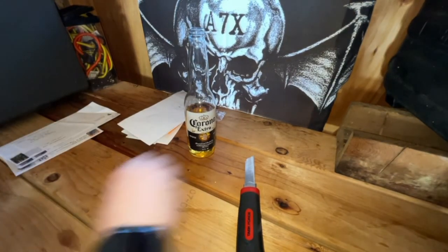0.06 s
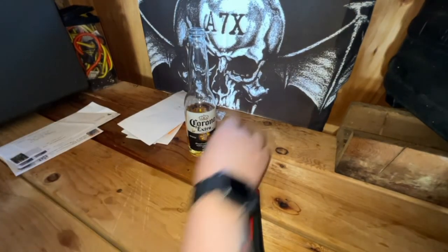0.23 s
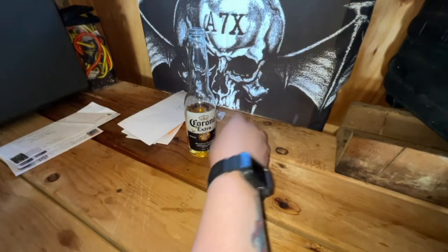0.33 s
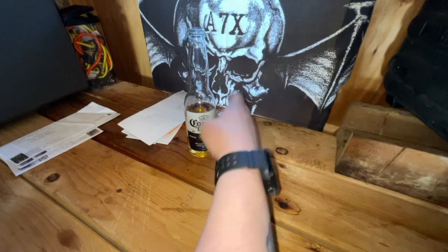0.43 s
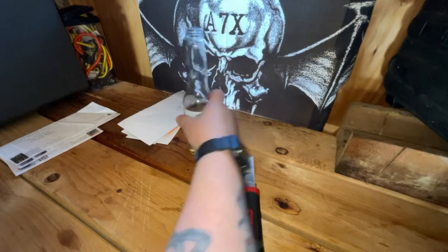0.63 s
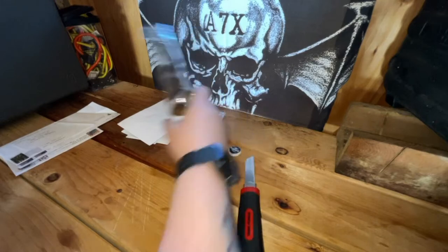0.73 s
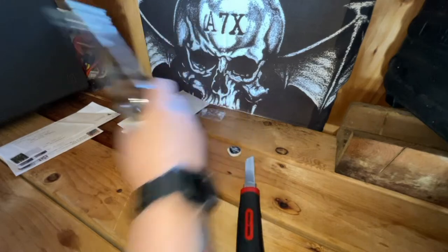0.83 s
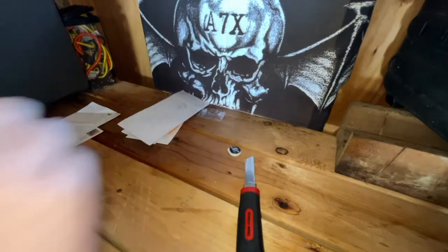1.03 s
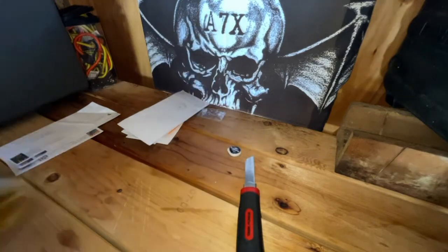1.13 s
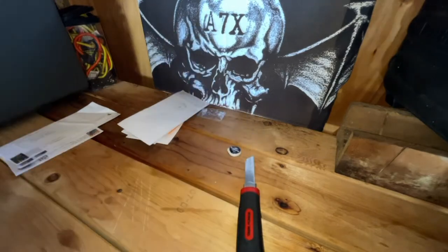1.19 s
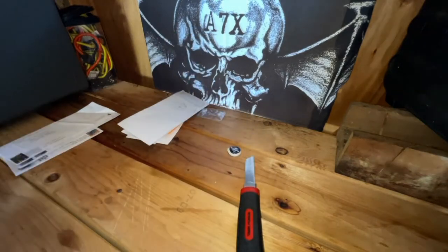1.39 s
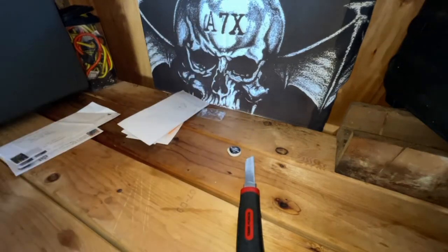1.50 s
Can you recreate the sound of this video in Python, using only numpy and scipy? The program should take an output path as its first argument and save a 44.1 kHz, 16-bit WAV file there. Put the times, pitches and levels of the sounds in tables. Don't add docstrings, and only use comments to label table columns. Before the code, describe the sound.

A hard, bright glass clink with quick bounces, lighter taps and a short woody scrape indoors

```python
import sys
import numpy as np
from scipy import signal
from scipy.fft import rfft, irfft
from scipy.io import wavfile
from scipy.ndimage import uniform_filter1d

SR = 44100
rng = np.random.default_rng(int(sys.argv[2]) if len(sys.argv) > 2 else 0)


def transcribe(u):
    v = np.clip(np.atleast_2d(u).T, -1, 1)
    q = np.round(v * 32767).astype(np.int16)
    wavfile.write(sys.argv[1], SR, q)


def linear_from_db(decibels):
    return 10 ** (np.asarray(decibels, float) / 20)


N = 68355
RISE_S = 0.0005
UPPER_SWELL_S = 0.001
GRIP_S = 0.49


def evened(x):
    return x / np.sqrt(np.mean(x ** 2) + 1e-20)


def read(points, hz):
    f, value = np.transpose(points)
    return np.interp(np.log(hz + 1), np.log(f + 1), value)


def add(mix, s, sound):
    part = mix[round(s * SR):][:len(sound)]
    part += sound[:len(part)]


def shaped(x, points, tilt_db=0):
    hz = np.fft.rfftfreq(x.shape[-1], 1 / SR)
    gain_db = read(points, hz) + tilt_db * np.log2(hz / 2000 + 0.29)
    return irfft(rfft(x) * linear_from_db(gain_db), x.shape[-1])


def ring(modes, scatter_db, pitch=1, rise_s=RISE_S):
    t = np.arange(SR // 3) / SR
    out = np.zeros(len(t))
    for (hz, db, t60), scatter in zip(modes, scatter_db):
        out += linear_from_db(db + scatter - 60 * t / t60) * np.sin(2 * np.pi * hz * pitch * t)
    return (1 - np.exp(-t / rise_s)) ** 2 * out


def strokes(start, end, bend):
    t = np.arange(N) / SR
    return np.sin(np.pi * np.clip((t - start) / (end - start), 0, 1) ** bend)


def wavering(hz, width):
    f = np.fft.rfftfreq(N, 1 / SR)
    return evened(irfft(rfft(rng.standard_normal(N)) / (1 + (2 * (f - hz) / width) ** 4), N))


def tone(curve, turns):
    t = np.arange(N) / SR
    s, hz, db = np.transpose(curve)
    cycles = turns + np.cumsum(np.interp(t, s, hz)) / SR
    return np.sqrt(2) * linear_from_db(np.interp(t, s, db)) * np.sin(2 * np.pi * cycles)


# pitch in Hz, level in dB.
AIR_SPECTRUM = [(76, -17), (130, -5), (198, -5), (348, -7.5), (461, -11), (893, -13), (1660, -13.5),
                (6390, -41.5), (15800, -46)]


def air():
    frames, hz = N // 256 + 5, np.fft.rfftfreq(1024, 1 / SR)
    a, b, patches = rng.standard_normal((frames, 513, 3)).T
    swell = evened(uniform_filter1d(patches[0], 30))
    patches = evened(uniform_filter1d(uniform_filter1d(patches, 12, 0), 12, 1))
    level_db = read(AIR_SPECTRUM, hz)[:, None] + 1.4 * patches + 0.13 * swell
    z = (a + 1j * b) * linear_from_db(level_db) * (hz > 60)[:, None]
    return linear_from_db(-50.5) * evened(signal.istft(z, nperseg=1024, noverlap=768)[1][:N])


# time in seconds, pitch in Hz, level in dB.
MAIN_HUM = [(0.0, 59.5, -39), (0.03, 56.94, -31.5), (0.172, 56.06, -35), (0.272, 55.4, -40.5),
            (0.518, 55.06, -38.5), (0.544, 55.93, -43), (0.604, 55.74, -35.5), (0.65, 55.32, -40),
            (0.694, 55.9, -32.5), (0.738, 55.1, -44), (0.768, 54.44, -39), (0.88, 52.86, -47),
            (1.078, 53.8, -36.5), (1.1, 53.2, -42), (1.23, 53.2, -37), (1.32, 50.7, -47.5),
            (1.342, 49.97, -40), (1.55, 49.56, -42)]
# time in seconds, pitch in Hz, level in dB.
SECOND_TONE = [(0, 67.8, -85), (.45, 66.57, -59.5), (.6, 66.6, -50.5), (1.0, 67.43, -50.5),
               (1.25, 65.15, -52.5), (1.55, 66.5, -49)]
# pitch in Hz, level in dB.
FUZZY_TONES = [(111.4, -54), (43, -53.5), (161.6, -67)]


def hum():
    out = tone(MAIN_HUM, 0) + tone(SECOND_TONE, 0.3)
    for hz, db in FUZZY_TONES:
        out += linear_from_db(db) * wavering(hz, 11)
    rumble = wavering(60, 50)
    return out + linear_from_db(-46) * rumble


# pitch in Hz, time to fade by 60 dB in seconds.
ROOM_FADE = [(300, 0.22), (1500, .22), (3500, 0.18), (5100, 0.15), (9000, .14), (15000, 0.055)]


def room(x):
    taps = np.zeros(SR // 2)
    at = np.arange(120, len(taps) - 20, 20)
    taps[at + rng.integers(0, 20, len(at))] = rng.choice([-1., 1.], len(at))
    hz, t, z = signal.stft(taps, SR, nperseg=256)
    fade = linear_from_db(-60 * t / read(ROOM_FADE, hz)[:, None])
    tail = signal.istft(z * fade, SR, nperseg=256)[1]
    return signal.fftconvolve(x, tail / np.linalg.norm(tail))[:N]


# start in seconds, end in seconds, level in dB.
FIZZ_STROKES = [
    (0.246, .32, -58),
    (0.397, .43, -59),
    (.452, 0.513, -67),
    (0.487, .545, -64),
    (.69, 0.7, -68),
]
# pitch in Hz, level in dB.
FIZZ_SPECTRUM = [(12900, -40), (13400, -3), (13900, -12), (14800, 0), (15300, -5), (15800, -25)]


def fizz(grit):
    patch = round(0.006 * SR)
    patches = evened(uniform_filter1d(uniform_filter1d(grit, patch), patch))
    hiss = evened(shaped(grit, FIZZ_SPECTRUM) * linear_from_db(3 * patches))
    out = np.zeros(N)
    for start, end, db in FIZZ_STROKES:
        out += linear_from_db(db) * strokes(start, end, 0.59) * hiss
    return out


# start in seconds, end in seconds, grit level in dB,
# level in dB of the glass rings it sets singing, tilt in dB per octave (higher is brighter).
RUBS = [
    (.378, 0.48, -47, -85, -2.5),
    (-0.18, .24, -62, -90, 6),
    (.245, .34, -52, -90, 8),
    (.492, 0.5834, -44, -63, 0),
    (.378, .435, -62, -68, 4.5),
    (.455, 0.55, -64, -72, 10),
    (1.36, 1.55, -62.5, -95.5, -1.5),
]
# pitch in Hz, level in dB.
GRIT_SPECTRUM = [(250, -23), (700, -4.5), (2500, -1.5), (4600, -12.5), (5300, -13.5), (6000, -23.5),
                 (12000, -28), (15800, -33.5)]


def scraping(grit):
    high = UPPER_GLASS[1:]
    damped = [(hz, db, 0.12 * t60) for hz, db, t60 in high]
    sung = evened(signal.fftconvolve(grit, ring(damped, np.zeros(len(high))))[:N])
    out = np.zeros(N)
    for start, end, grit_db, sung_db, tilt_db in RUBS:
        hiss = evened(shaped(grit, GRIT_SPECTRUM, tilt_db))
        out += strokes(start, end, 0.5) * (linear_from_db(grit_db) * hiss + linear_from_db(sung_db) * sung)
    return out


# time in seconds, level in dB, pitch factor.
BASE_SLIPS = [
    (0.502, -38, 1.05),
    (0.5075, -34, 1.24),
    (0.5139, -27, 1.06),
    (0.5268, -31.5, 0.92),
    (0.537, -40, .85),
    (0.544, -34.5, 0.954),
    (.549, -38, .8),
]
# pitch in Hz, level in dB, time to fade by 60 dB in seconds.
BOARDS = [(177, -35, 0.076), (233, -2.5, 0.052), (304, 1, 0.044), (391, -7.5, 0.042), (546, -6, 0.036),
          (647, -15, 0.032)]


def slips():
    out = np.zeros(N)
    for s, db, pitch in BASE_SLIPS:
        scatter = 4 * rng.standard_normal(len(BOARDS))
        add(out, s, linear_from_db(db) * ring(BOARDS, scatter, pitch))
    return out


def drag():
    grit = (rng.random(N) < 11000 / SR) * rng.standard_normal(N)
    return slips() + scraping(grit) + fizz(grit)


# pitch in Hz, level in dB.
CRACK_SPECTRUM = [(100, -40.5), (300, -18.5), (1500, -12.5), (3500, -9.5), (5000, -9), (7240, -10.5),
                  (12000, -16.5), (15800, -33)]


def crack(db, noise, dull_db=0):
    t = np.arange(len(noise)) / SR
    tilt_db = dull_db - 6.5 * (-11.0 - db) / 20
    envelope = (1 - np.exp(-t / RISE_S)) * linear_from_db(db - 60 * t / 0.048)
    return envelope * evened(shaped(noise, CRACK_SPECTRUM, tilt_db))


# time in seconds, pitch in Hz, level in dB,
# time to fade by 60 dB in seconds.
LONE_RINGS = [(.3805, 6580, -39, .055), (.402, 6578, -53, .14), (.4935, 6592, -36, .04),
              (.494, 13370, -52, .07), (.511, 13370, -54, .1), (.544, 13380, -60, .09),
              (.462, 9400, -60, .05), (.494, 11880, -48, .03), (.4985, 9750, -50, .03),
              (.494, 2400, -42, .05), (.515, 7500, -52, .04), (.542, 11950, -52, .04),
              (.542, 10700, -54, .04), (.546, 7280, -55, .07), (.556, 12030, -55, .05),
              (.536, 15500, -58, .03), (.471, 7800, -60, .03), (.3805, 11860, -54, .03),
              (.381, 12850, -50, .06), (.392, 2280, -44, .05), (.58, 5080, -56, .06),
              (.381, 9380, -43, .07), (.409, 13385, -60, .1), (.402, 15000, -58, .04),
              (.416, 15050, -58, .04), (.381, 1380, -44, .07), (.258, 4602, -25, .12),
              (.29, 4612, -35, .12), (.335, 4590, -55, .2), (.245, 920, -27, .05), (.246, 450, -32, .06),
              (.38, 1650, -41, .05), (.669, 14800, -64, .04), (.697, 14900, -56, .01),
              (.697, 13700, -58, .01)]


def lone_rings():
    out = np.zeros(N)
    for s, hz, db, t60 in LONE_RINGS:
        add(out, s, ring([(hz, db, t60)], [0], 1, UPPER_SWELL_S))
    return out


# time in seconds, then levels in dB of the crack, the low ring,
# the second ring and the upper rings.
GLASS_TAPS = [
    (0.3794, -32.5, -32, -48, -64),
    (0.3908, -43, -50, -37.5, -68),
    (0.4933, -34.5, -38, -35.5, -50),
    (.512, -50, -38, -46, -61),
    (0.5420, -38.5, -28, -44.5, -50.5),
]
# pitch in Hz, level in dB, time to fade by 60 dB in seconds.
LOW_GLASS = [(4556, -3, .14), (4606, 0, .2)]
HELD_GLASS = [(4590, 0, .06), (4608, -14, .08), (4380, -12, .03)]
SECOND_GLASS = [(5075, 0, .05), (5160, -3, .07), (5290, -8, .03)]
UPPER_GLASS = [(7250, -6, .06), (9390, -2, .05), (9740, -8, .03), (10720, -6, .04), (11860, -8, .03),
               (12030, -8, .04), (13380, -15, .06), (14990, -16, .03), (14750, -16, .03)]


def clinks():
    out = np.zeros(N)
    for s, crack_db, low_db, second_db, upper_db in GLASS_TAPS:
        c = rng.standard_normal(9)
        low = HELD_GLASS if s > GRIP_S else LOW_GLASS
        add(out, s, crack(crack_db, rng.standard_normal(4096), -0.8))
        add(out, s, linear_from_db(low_db) * ring(low, 0.5 * c))
        add(out, s, linear_from_db(second_db) * ring(SECOND_GLASS, 0.63 * c[3:]))
        add(out, s, linear_from_db(upper_db) * ring(UPPER_GLASS, 1.3 * c, 0.97, UPPER_SWELL_S))
    return out


# time in seconds, then levels in dB of the crack,
# the main ring and the upper rings.
LANDINGS = [
    (.23492, -23, -5, -37),
    (.2424, -15.5, 8, -6),
    (.24684, -17, -9, -22),
    (.25304, -23, -10, -34),
    (.26112, -27.5, -27, -40),
]
# pitch in Hz, level in dB, time to fade by 60 dB in seconds.
LANDING_MAIN = [(5075, 0, .028), (5165, -11, .035), (4935, -9, .022), (4420, -14, .03), (4293, -17, .03)]
# pitch in Hz, level in dB, time to fade by 60 dB in seconds.
LANDING_UPPER = [(11870, -3, 0.02), (9560, -3, .012), (15100, -2, .006), (10380, -5.5, 0.0069),
                 (8480, -6, .012), (1647, -8.5, 0.026), (354, -22.5, 0.055)]


def drops():
    out = np.zeros(N)
    for s, crack_db, main_db, upper_db in LANDINGS:
        c = rng.standard_normal(8)
        add(out, s, crack(crack_db, rng.standard_normal(4096)))
        add(out, s, linear_from_db(main_db) * ring(LANDING_MAIN, 0.6 * c, 0.99, 0.0016))
        add(out, s, linear_from_db(upper_db) * ring(LANDING_UPPER, 0.802 * c[1:]))
    return out


def scene():
    near = drops() + clinks() + lone_rings() + drag()
    return (near + linear_from_db(-14) * room(near) + hum() + air())[None]


# pitch in Hz, level in dB.
MIC_DIP = [(11900, 0), (12500, -8), (13000, -8.5), (13300, 0)]


def microphone(x):
    return 0.95 * np.tanh(shaped(x, MIC_DIP) / 0.95)


def roll_off(x):
    return signal.sosfilt(signal.butter(12, 15920, fs=SR, output="sos"), x)


def record(dry):
    low_cut = signal.butter(2, 27, "high", fs=SR, output="sos")
    high_cut = signal.firwin(255, 15800, window=("kaiser", 9), fs=SR)
    x = signal.sosfilt(low_cut, microphone(dry))
    x = signal.oaconvolve(x, high_cut[None], "same")
    return roll_off(x)


dry = scene()
out = record(dry)
transcribe(out)
```